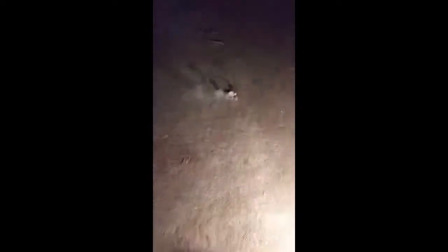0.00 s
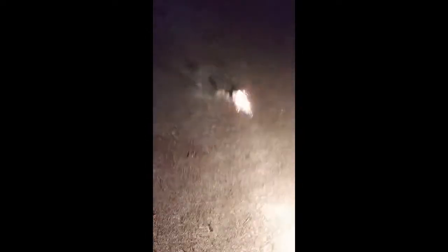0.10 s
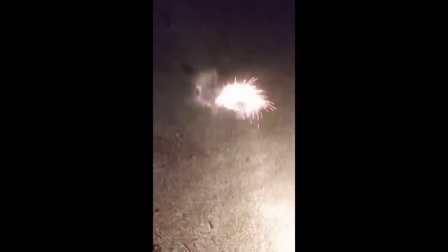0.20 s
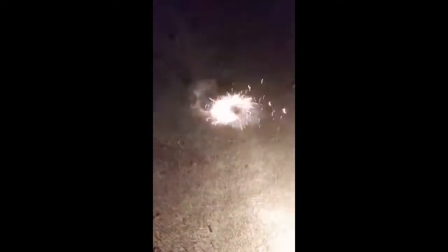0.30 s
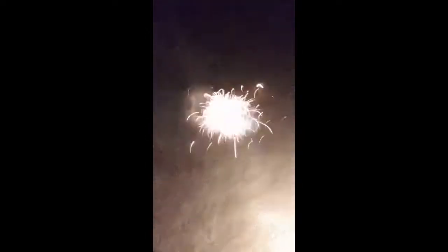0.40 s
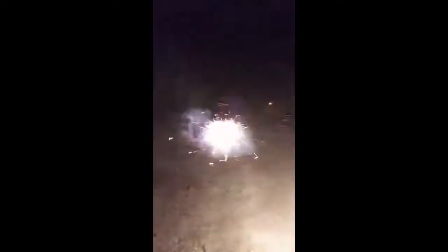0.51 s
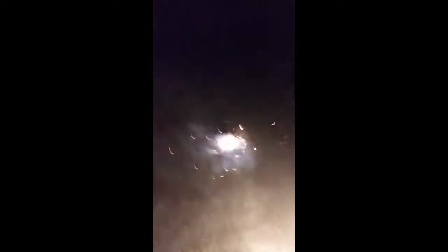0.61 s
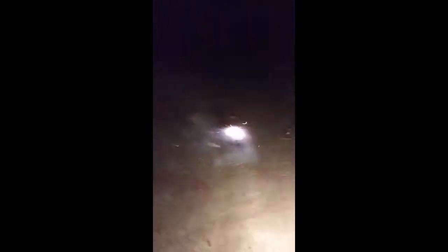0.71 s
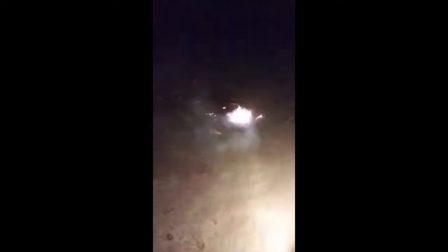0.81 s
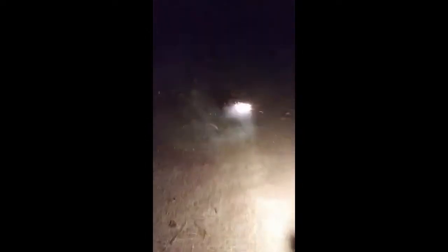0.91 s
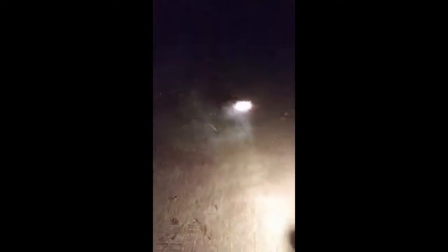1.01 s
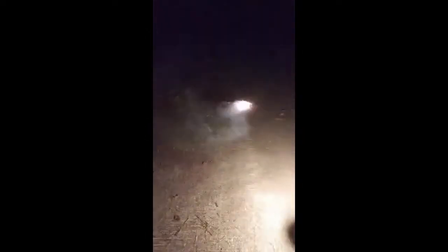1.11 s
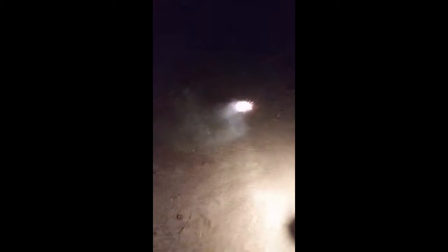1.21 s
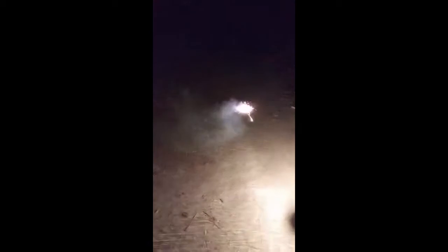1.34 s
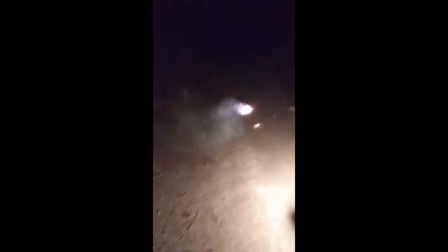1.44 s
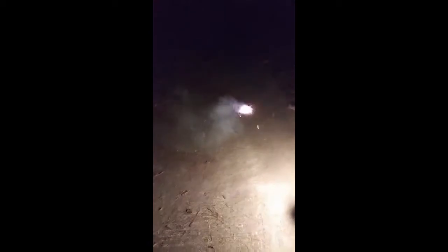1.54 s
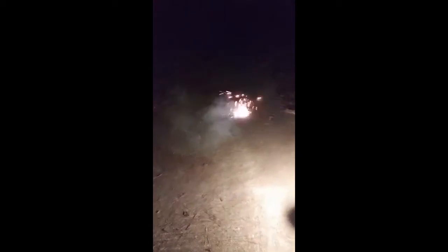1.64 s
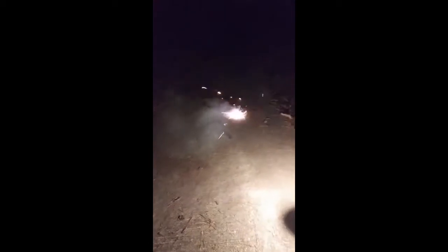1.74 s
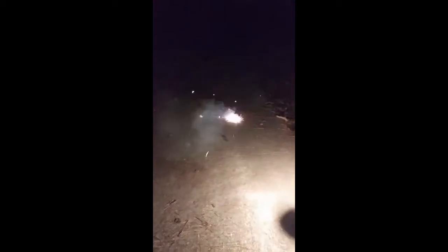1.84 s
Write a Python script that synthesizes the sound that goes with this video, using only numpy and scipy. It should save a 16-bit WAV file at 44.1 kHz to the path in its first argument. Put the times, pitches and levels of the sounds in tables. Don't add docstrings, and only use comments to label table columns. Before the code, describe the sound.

Firework spinning on concrete: a quick loud fizzing whoosh, then a weak, uneven hiss with small ticks.

```python
import sys
import numpy as np
from scipy import signal
from scipy.fft import rfft, irfft
from scipy.io import wavfile
from scipy.ndimage import uniform_filter1d, map_coordinates

SR = 44100
rng = np.random.default_rng(int(sys.argv[2]) if len(sys.argv) > 2 else 0)


def ratio_of_db(decibels):
    return 10 ** (np.asarray(decibels, float) / 20)


def unload_audio(sound):
    columns = np.transpose(np.atleast_2d(sound))
    steps = np.round(np.clip(columns, -1, 1) * 32767)
    wavfile.write(sys.argv[1], SR, steps.astype(np.int16))


N = 83790
TIME_S = np.arange(N) / SR


def evened(x):
    return x / np.sqrt(np.mean(abs(x) ** 2) + 1e-20)


def coloured(x, points):
    f, db = np.transpose(points)
    bins = np.fft.rfftfreq(len(x), 1 / SR)
    gain = ratio_of_db(np.interp(np.log(bins + 1), np.log(f + 1), db))
    return irfft(rfft(x) * evened(gain), len(x))


def drift(length_s):
    size = max(round(length_s * SR), 1)
    once = uniform_filter1d(rng.standard_normal(N), size)
    return evened(uniform_filter1d(once, size))


def patchy():
    patch_db = 0
    real, imaginary, patch = rng.standard_normal((N // 128 + 5, 257, 3)).T
    patch = uniform_filter1d(uniform_filter1d(patch, size=6, axis=0), size=14, axis=1)
    cells = (real + 1j * imaginary) * ratio_of_db(patch_db * evened(patch))
    return evened(signal.istft(cells, nperseg=512, noverlap=384)[1][:N])


def resonate(x, hz, width_hz):
    turn = np.exp(2j * np.pi * np.cumsum(hz) / SR)
    r = np.exp(-np.pi * width_hz / SR)
    return 2 * (turn * signal.lfilter([1 - r], [1, -r], x / turn)).real


def resonate_twice(x, hz, width_hz):
    return evened(resonate(resonate(x, hz, width_hz), hz, width_hz))


def control(column):
    # t/s, thrust level/dB, roar level/dB (dullness), ground echo delay/ms, sizzle level/dB (sharpness)
    burn_rows = [(0, -56, -26, 0.67, -8), (0.176, -52.5, -6, 0.79, 7.5), (0.209, -29.5, -2.5, 0.73, -1),
                 (0.291, -20.5, 2.5, 0.63, 9.5), (.38, -19.5, 0.5, 0.75, -3), (.45, -16.5, -2, 0.73, -10),
                 (.51, -13.5, -1, 0.8, 1), (0.616, -15.5, -0.5, 0.84, -6.5), (0.666, -28, 5.5, 0.89, 7.5),
                 (.69, -41.5, 9, 0.97, 8.5), (.76, -37.5, -20, 1.1, 8), (0.871, -50, 12.5, 1.11, -3),
                 (1.07, -52.5, 7.5, 0.85, 5), (1.28, -48, 11.5, 1.1, -6), (1.42, -39, 7.5, 1.09, -14.5),
                 (1.6, -53.5, 12, 1.08, 9), (1.74, -50.5, 8, 1.11, 3.5), (1.9, -44.5, 9, 1.1, -21)]
    rows = np.array(burn_rows)
    return np.interp(TIME_S, rows[:, 0], rows[:, column])


def sputter_db():
    # middle t/s, half length/s, level change/dB
    sputter_rows = [(0.012, .003, 14), (0.018, 0.0013, 16.5), (0.036, 0.015, 13), (0.33, 0.032, -7.5),
                    (0.417, 0.024, -6.5), (0.577, 0.048, -3.5), (1.153, 0.0036, 4.5), (1.17, 0.043, 9.5),
                    (1.186, 0.0027, 8.5), (1.313, 0.011, 6.5), (1.331, 0.0047, 13), (1.41, 0.0073, 7),
                    (1.42, .008, 3.5), (1.465, 0.04, 4.5), (1.709, 0.038, 7.5), (1.803, 0.09, 6.5)]
    total = np.zeros(N)
    for middle_s, half_s, db in sputter_rows:
        place = np.clip((TIME_S - middle_s) / abs(half_s), -1, 1)
        total += db * np.cos(np.pi / 2 * place) ** 2
    return total


def spin_sweep():
    spin_hz, settles_from_s = 61.1, 1
    turns = np.cumsum(spin_hz * (1 + 0.11 * drift(0.046))) / SR
    return np.cos(2 * np.pi * turns) * np.clip(0.4 + (TIME_S - settles_from_s) / 0.27, 0.4, 1)


def sparks():
    per_s, spread_db = 500, 5
    strength = ratio_of_db(spread_db * np.minimum(rng.exponential(1, N), 2.5))
    return evened(strength * rng.choice([-1., 1.], N) * (rng.random(N) < per_s / SR))


def cracks():
    # f/Hz, level/dB
    crack_spectrum = [(2000, -30), (6000, -8), (10000, -6), (13000, -9), (16000, -12)]
    per_s, spread_db = 60, 4
    strength = ratio_of_db(spread_db * np.minimum(rng.exponential(1, N), 2))
    return coloured(evened(strength * (rng.random(N) < per_s / SR)), crack_spectrum)


def jet():
    # f/Hz, level/dB per Hz
    fizz_spectrum = [(90, -45), (255, -28), (1760, -15), (3500, -2), (6000, 2.5), (8500, -0.5),
                     (11000, -22.5), (15800, -56)]
    roar_spectrum = [(90, -33), (250, -12.5), (750, -3.5), (1150, -5), (1800, -4.5), (4500, -10.5),
                     (8000, -22.5), (13000, -35)]
    sizzle_spectrum = [(5000, -34), (9000, 0.5), (10500, -3), (13000, -18.5), (16000, -21)]
    sparks_db, roar_db, sizzle_db, cracks_db = -12, -4, -7.5, -32.5
    flicker_db, spin_db = 2.0, 1.5

    kick_db = sputter_db()
    flicker = 0.36 * drift(0.0034) + 0.5 * drift(0.0017)
    thrust_db = control(column=1) + flicker_db * flicker + spin_db * spin_sweep()
    jet_db = thrust_db + kick_db
    flame = patchy() + ratio_of_db(sparks_db) * sparks()

    fizz = coloured(flame, fizz_spectrum) * ratio_of_db(jet_db)
    roar = coloured(patchy(), roar_spectrum) * ratio_of_db(thrust_db + 0.5 * kick_db + roar_db + control(column=2))
    sharpness_db = control(column=4) + 4.5 * drift(0.035)
    sizzle = coloured(flame, sizzle_spectrum) * ratio_of_db(sizzle_db + jet_db + sharpness_db)
    return fizz + roar + sizzle + cracks() * ratio_of_db(cracks_db + jet_db)


def echoes(x):
    top_hz, body_ms, body_share = 6950, 0.425, 0.35
    quiet_share, flare_share = 0.55, 0.42
    n = np.arange(N)
    dull = np.convolve(x, signal.firwin(31, top_hz, fs=SR), "same")
    share = np.interp(control(column=1), [-40, -30], [quiet_share, flare_share])
    ground = map_coordinates(dull, [n - control(column=3) * SR / 1000], order=3)
    body = map_coordinates(dull, [n - body_ms * SR / 1000], order=3)
    return x + share * ground + body_share * body


def yard(x):
    level_db, t60_s, returns_per_s = -15.5, 0.74, 2000
    t = np.arange(SR // 2) / SR
    hits = rng.standard_normal(len(t)) * (rng.random(len(t)) < returns_per_s / SR)
    tail = hits * ratio_of_db(-60 * t / t60_s) * (t > 0.006)
    return ratio_of_db(level_db) * signal.fftconvolve(x, tail / np.linalg.norm(tail))[:N]


def town():
    # f/Hz, level/dB per Hz
    town_spectrum = [(25, -29), (144, -12), (513, -7), (750, -7.5), (1050, -12.5), (1400, -19), (6300, -42),
                     (15800, -46)]
    level_db = -45.5
    return ratio_of_db(level_db + 1.0 * drift(0.17)) * coloured(patchy(), town_spectrum)


def ticks():
    # t/s, peak level/dB, f/Hz, t60/s
    knock_rows = [(.1655, -31, 2300, .003), (.1658, -34, 3400, .003), (.175, -40, 2800, .003),
                  (.12, -42, 4000, .002), (.041, -37, 4000, .003), (.465, -27, 260, .03),
                  (.803, -32, 1400, .008), (1.6935, -30, 3900, .003), (1.6930, -30, 900, .006),
                  (1.706, -29, 1650, .004), (1.7091, -19, 1750, .0045), (1.7092, -30, 4300, .003),
                  (1.7092, -30, 2900, .003), (1.718, -34, 2900, .003), (1.715, -31, 1700, .004),
                  (1.715, -33, 4200, .002), (1.7179, -24, 1650, .005), (1.718, -31, 4300, .003)]
    snap_db, snap_t60_s, length = -9.5, 0.006, 1500
    t, out = np.arange(length) / SR, np.zeros(N + length)
    dull = signal.butter(4, [900, 5500], "band", fs=SR, output="sos")
    for s, db, hz, t60 in knock_rows:
        at = round(s * SR)
        fade = np.exp(-np.log(1000) * (t / t60) ** 2)
        onset = np.minimum(t / (0.11 * t60), 1)
        ring = fade * onset * np.sin(2 * np.pi * hz * t)
        noise = rng.standard_normal(length)
        snap = signal.sosfilt(dull, ratio_of_db(snap_db - 60 * t / snap_t60_s) * noise * 2)
        out[at:at + length] -= ratio_of_db(db) * (ring + snap)
    return out[:N]


def bore():
    # f/Hz, width/Hz, level/dB
    bore_modes = [(913, 470, 0.5), (1897, 240, -8), (2580, 310, -49)]
    level_db, start_s, growth = -45.5, 0.51, 0.1
    flame = rng.standard_normal(N) * ratio_of_db(0.83 * drift(0.0071))
    hum = sum(ratio_of_db(db) * resonate_twice(flame, hz * np.ones(N), width) for hz, width, db in bore_modes)
    opening = np.clip((TIME_S - start_s) / 0.17, 0, 1)
    thrust_db = growth * (control(column=1) + 48)
    return hum * opening * ratio_of_db(level_db + thrust_db + 1.1 * drift(0.06))


def skid():
    # start f/Hz, end f/Hz, width/Hz, level/dB
    skid_modes = [(1070, 1200, 90, 0), (1900, 2050, 200, -6)]
    start_s, length_s, slips_per_s, level_db = 0.822, 0.138, 60, -43
    progress = (TIME_S - start_s) / length_s
    slips = np.cumsum(slips_per_s * (1 + 0.3 * drift(0.012))) / SR
    rub = rng.standard_normal(N) * (0.28 + np.exp(-(slips % 1) / 0.2))
    ring = np.zeros(N)
    for start_hz, end_hz, width, db in skid_modes:
        hz = start_hz + (end_hz - start_hz) * progress.clip(0, 1)
        ring += ratio_of_db(db) * resonate_twice(rub, hz, width)
    return ratio_of_db(level_db) * ring * np.clip(progress / 0.07, 0, 1) * np.clip((1 - progress) / 0.029, 0, 1)


def scene():
    near = echoes(jet()) / 1.796 + ticks() + bore() + skid()
    return (near + yard(near) + town())[None]


def roll_off(x):
    return signal.sosfilt(signal.butter(12, 16050, fs=SR, output="sos"), x)


def record(dry):
    port_hz, port_width_hz, port_db = 7410, 810, 2.5
    knee, low_cut_hz, edge_hz = 0.48, 85, 15720
    x = dry[0] + ratio_of_db(port_db) * resonate(dry[0], port_hz * np.ones(N), port_width_hz)
    x = knee * np.tanh(x / knee)
    x = x * np.clip(TIME_S / 0.0031, 0.3, 1)
    x = signal.sosfilt(signal.butter(4, low_cut_hz, "high", fs=SR, output="sos"), x)
    x = signal.oaconvolve(x, signal.firwin(1023, edge_hz, window=("kaiser", 10), fs=SR), "same")
    return roll_off(x[None])


dry = scene()
out = record(dry)
unload_audio(out)
```